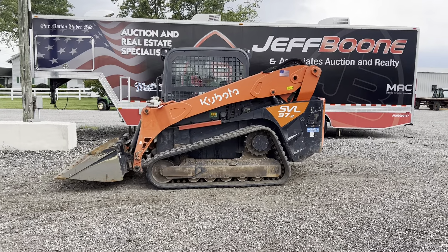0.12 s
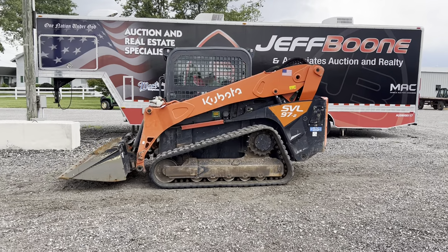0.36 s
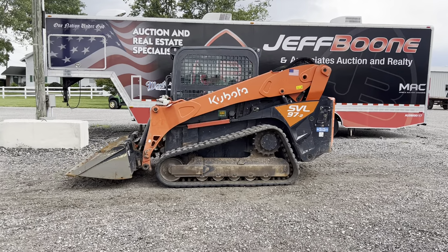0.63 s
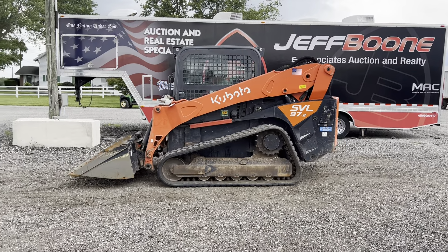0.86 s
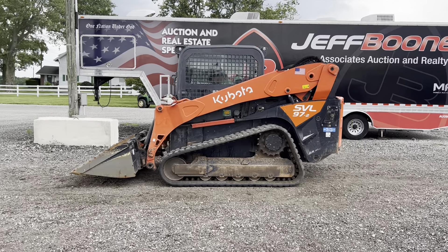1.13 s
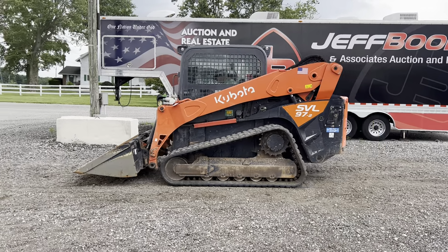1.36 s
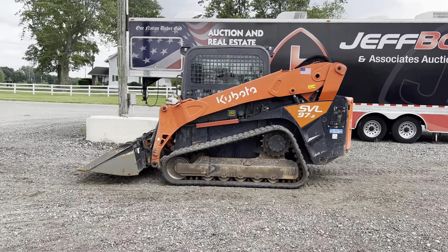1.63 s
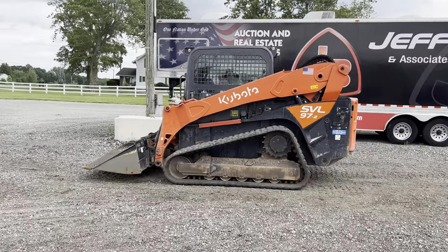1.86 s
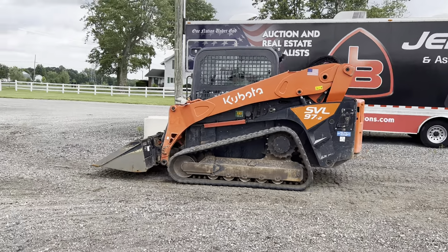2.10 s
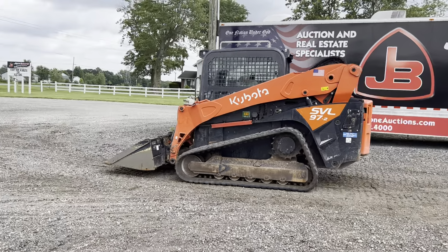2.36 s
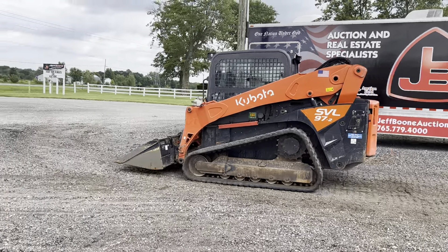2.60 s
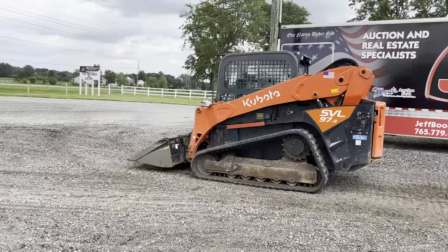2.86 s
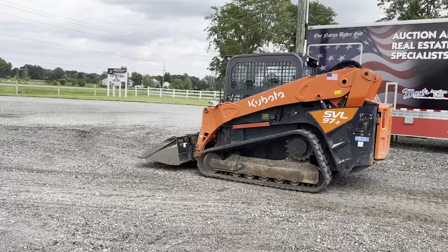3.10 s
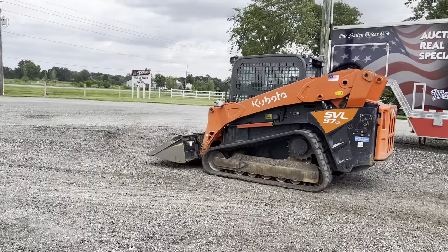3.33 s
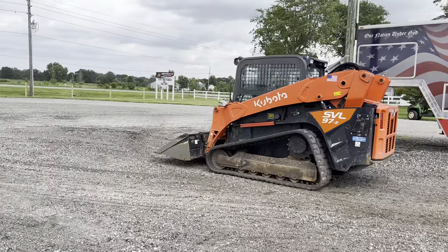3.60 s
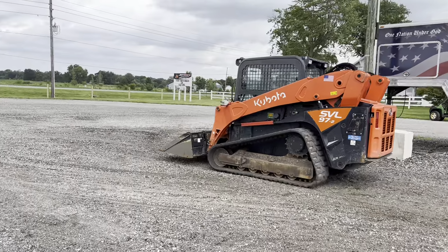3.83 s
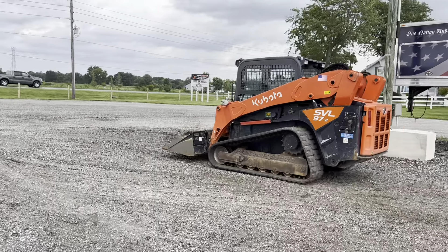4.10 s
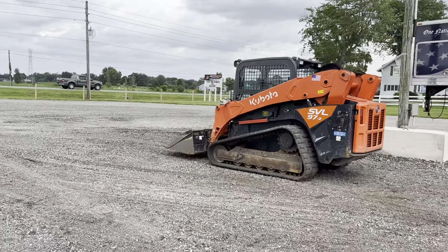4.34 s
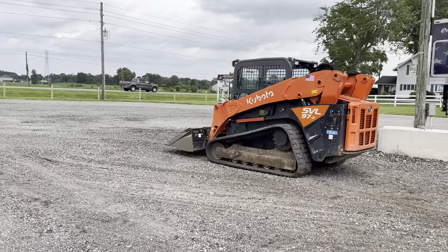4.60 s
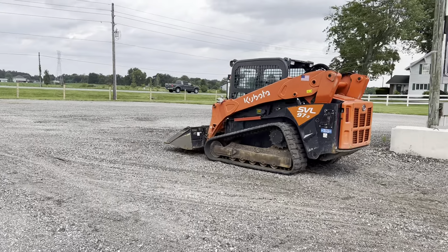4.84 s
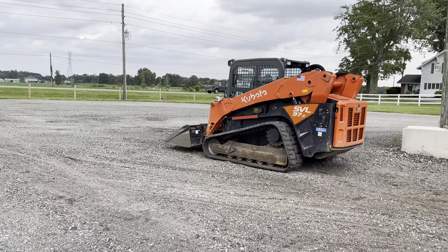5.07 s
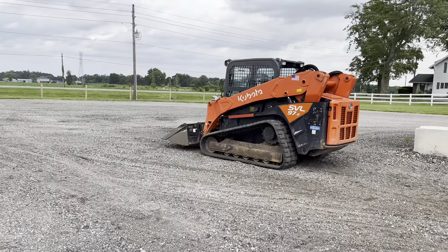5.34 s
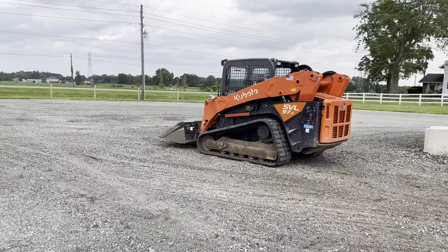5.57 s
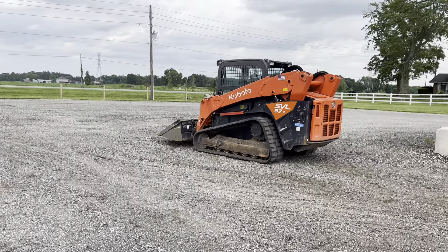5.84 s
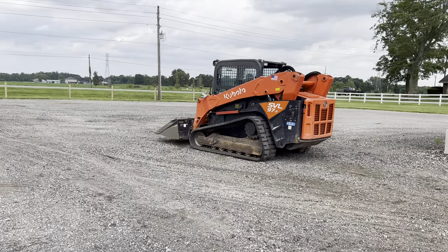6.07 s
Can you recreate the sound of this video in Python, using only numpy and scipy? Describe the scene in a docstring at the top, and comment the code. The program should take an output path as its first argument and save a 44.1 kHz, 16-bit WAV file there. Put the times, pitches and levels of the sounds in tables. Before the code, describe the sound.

A handheld phone hears a compact diesel machine idling roughly, then setting off on steel-sounding tracks. Dry clanks come around eighteen a second, with crisp gravel crunch and bright stone cracks. Small wind pops accompany it from the start; in the second half a low exhaust hum surges unevenly and strong gusts thump and rumble over everything in the open lot.

```python
"""Gravel lot: a tracked diesel loader idles, pulls away and drives off past a phone in rising wind.
Randomly rough coloured noise makes the engine roar, with a drive whirr and an exhaust hum.
Damped sines make sprocket teeth clank in the tracks and stones ping; coloured noise makes gravel crunch.
Gusts are lumpy low noise with pops on the two microphone ports; the bass edge slides along a curve."""
import sys
import numpy as np
from scipy import signal
from scipy.fft import rfft, irfft, next_fast_len
from scipy.io import wavfile
from scipy.ndimage import uniform_filter1d, map_coordinates

SR = 44100
rng = np.random.default_rng(int(sys.argv[2]) if len(sys.argv) > 2 else 0)


def natural_amplitude(level_db):
    """Convert a level in decibels to a linear amplitude factor, elementwise."""
    exponent = np.asarray(level_db, float) / 20
    return 10 ** exponent


def materialize(psi):
    """Save the field psi as 16-bit PCM at rate SR to the path in sys.argv[1].

    A 1-D psi becomes a single channel; in a 2-D psi each row is a channel.
    """
    bounded = np.clip(np.atleast_2d(psi).T, -1, 1)
    quanta = np.round(bounded * 32767).astype(np.int16)
    wavfile.write(sys.argv[1], SR, quanta)


N = 273420

# The machine gets under way. Each row: time in seconds, engine roar in dB, whirr of the drive in dB,
# grinding of gravel in dB, fine crunch in dB.
DRIVE = [(0, -32.5, -40.5, -56, -61), (.9, -34, -37.5, -50, -73), (1.15, -31.5, -33.5, -49, -53),
         (1.45, -28, -30.5, -45, -45.5), (2, -29, -29.5, -44, -49), (2.6, -30.5, -30, -43, -48.5),
         (2.92, -30, -31, -42, -48.5), (3.1, -32, -35, -42, -43), (3.3, -30, -29.5, -40.5, -43),
         (3.75, -31, -29.5, -41, -47.5), (4.3, -29.5, -28.5, -39.5, -48), (4.9, -29.5, -29.5, -41, -45),
         (5.25, -30, -30.5, -41, -51), (5.7, -31, -30, -41, -45.5), (6.2, -27.5, -34, -43, -53)]
# Stones cracking under the tracks. Each row: start in seconds, crack level in dB, pitch in Hz,
# level of the grit spray in dB.
STONES = [(.5496, -39, 11400, -54), (.637, -38, 11500, -45), (.841, -35, 7460, -58),
          (1.057, -34, 11100, -39), (1.078, -34, 7300, -55), (1.1588, -38, 12100, -53),
          (1.179, -30, 11000, -37), (1.2705, -34, 8160, -40), (1.411, -36, 6300, -48),
          (1.6087, -30, 6700, -60), (1.655, -34, 7900, -43), (1.6766, -26.5, 6140, -32),
          (1.70, -33, 7700, -38), (1.7893, -29.5, 7760, -66), (1.8497, -38, 5840, -64),
          (1.9041, -35, 6610, -60), (1.9555, -31, 6560, -61), (2.2797, -41, 6400, -36),
          (2.39, -30, 13200, -35.5), (2.4987, -25, 10500, -33.5), (2.7137, -36, 11600, -51),
          (2.8794, -35, 7300, -50), (2.9427, -31, 13900, -40), (2.9851, -32, 13900, -44),
          (3.0759, -33, 11600, -39), (3.1455, -29, 11000, -45), (3.3104, -34, 12500, -46),
          (3.3787, -31, 11600, -50), (3.5556, -26, 11400, -41), (3.6366, -37, 12500, -34),
          (3.7609, -37, 12700, -50), (4.115, -36, 12100, -37), (4.5446, -32, 11400, -57),
          (4.825, -33, 11200, -61), (5.006, -22, 11040, -45), (5.105, -29, 11200, -66),
          (5.2051, -31, 6360, -58), (5.217, -30, 5700, -60), (5.238, -30, 11100, -53),
          (5.6057, -31, 7900, -57), (5.7284, -34, 11400, -59)]
# Wind at the microphone. Each row: time in seconds, rumble in dB, deep buffeting in dB,
# bass edge in octaves under 400 Hz.
WIND = [(0, -33, -87, 0.67), (.12, -31, -73, 1), (.23, -29.5, -59, 0.92), (.33, -36.5, -66, 1.07),
        (.5, -22, -70, 0.9), (.76, -33, -88, 0.42), (1, -26.5, -87, 0.74), (1.4, -28, -72, 1.23),
        (1.55, -25.5, -74, 0.98), (2, -28.5, -70, 1.27), (2.2, -27.5, -70, 1.64), (2.35, -23, -68, 1.14),
        (2.48, -31, -58, 2.4), (2.67, -33, -80, 0.55), (2.83, -30, -56, 1.25), (2.9, -36, -58, 2),
        (2.96, -39, -70, 0.83), (3.04, -34, -82, 0.67), (3.2, -28, -68, 0.84), (3.27, -36, -54, 1.74),
        (3.34, -28, -66, 1.8), (3.42, -29.5, -72, 1.8), (3.55, -28, -76, 1.3), (3.72, -23, -73, 1.4),
        (3.85, -23, -56, 1.55), (4.3, -12.5, -39, 1.44), (4.44, -22, -48, 1.37), (4.62, -13.5, -41, 1.45),
        (5, -17, -40, 1.27), (5.2, -13.5, -43, 1.24), (5.33, -18.5, -49, 2.93), (5.4, -18, -26, 1.4),
        (5.55, -15, -15.5, 2.5), (5.75, -14.5, -21.5, 1.8), (5.96, -14.5, -17.5, 1.7),
        (6.2, -17, -22.5, 1.8)]


def unit(x):
    """Scaled to rms 1."""
    return x / np.sqrt(np.mean(x ** 2) + 1e-20)


def columns(rows, at, scale=lambda v: v):
    """Every column after the first, joined by straight lines and read at the given places."""
    first, *cols = np.transpose(rows)
    return [np.interp(scale(at), scale(first), c) for c in cols]


def curves(rows):
    """One value per sample for each column after the time."""
    return columns(rows, np.arange(N) / SR)


def wobble(rate):
    """A smooth random curve, rate knots a second."""
    knots = rng.standard_normal(int(N * rate / SR) + 4)
    return map_coordinates(knots, [np.arange(N) * rate / SR])


def filtered(x, response):
    """x times a complex response of frequency."""
    m = next_fast_len(N + SR // 2)
    hz = np.fft.rfftfreq(m, 1 / SR) + 1
    return irfft(rfft(x, m) * response(hz), m)[..., :N]


def rush(spectrum, lumps=1):
    """Two unrelated noises of one colour, rms 1 together, under shared lumps."""
    noise = lumps * rng.standard_normal((2, N))
    return unit(filtered(noise, lambda hz: natural_amplitude(columns(spectrum, hz, np.log)[0])))


def patchy(x, depth_db):
    """Random patches of gain, each some tens of ms long and some tens of Hz wide; rms 1."""
    z = signal.stft(x, nperseg=1024)[2]
    field = rng.standard_normal(z.shape[1:])
    field = uniform_filter1d(uniform_filter1d(field, size=2, axis=0), size=3, axis=1)
    return unit(signal.istft(z * natural_amplitude(depth_db * unit(field)), nperseg=1024)[1][:, :N])


def scattered(x, t60):
    """A hit, and the same hit smeared by a short tail of dying noise."""
    t = np.arange(SR // 20) / SR
    tail = rng.standard_normal(len(t)) * natural_amplitude(-60 * t / t60)
    return np.array([x, signal.fftconvolve(x, tail / np.linalg.norm(tail))[:N]])


def pings(rows, cycles, spread, longer, swell=0.23):
    """Damped sines that swell and die within some cycles, each with a stronger neighbour in pitch."""
    out, t = np.zeros(N + SR), np.arange(SR // 20) / SR
    for (s, db, hz), near in zip(rows, rng.standard_normal(len(rows))):
        u = t * hz / (cycles * (hz / 7000) ** longer)  # above 0, longer gives high pitches more cycles
        ring = np.sin(2 * np.pi * t * hz)
        ring = ring + 2.65 * np.sin(2 * np.pi * t * hz * (1 + spread * near))
        out[round(s * SR):][:len(t)] += natural_amplitude(db) * u ** swell * np.exp(-u) * ring
    return out[:N]


def pops(rows, cycles):
    """Brief pushes of pressure that swell and sink evenly about their middle."""
    out, t = np.zeros(N + SR), np.arange(-SR // 20, SR // 20) / SR
    for s, db, hz in rows:
        bell = np.exp(-(t * hz / cycles) ** 2)
        out[round(s * SR):][:len(t)] -= natural_amplitude(db) * bell * np.cos(2 * np.pi * hz * t)
    return out[SR // 20:][:N]


def engine():
    """Randomly rough roar with barely a trace of the firing rate, drive whirr, hum at three times that rate."""
    # Colour of the roar. Each row: frequency in Hz, relative density in dB.
    roar_colour = [(200, -4.5), (400, 4), (560, -3), (850, -7.5), (1000, -12.5), (1120, -11.5),
                   (1280, -7.5), (1420, -10.5), (1650, -12), (1850, -12.5), (2070, -20), (2400, -13.5),
                   (2700, -25), (3050, -21), (3450, -25.5), (4500, -23), (5300, -37), (6500, -26.5),
                   (9000, -58), (16000, -36)]
    # Colour of the whirr. Each row: frequency in Hz, relative density in dB.
    whirr_colour = [(400, -32), (650, -1.5), (800, 0.5), (930, 0.5), (1050, -6), (1400, -14), (1650, -9),
                    (1900, -14.5), (2100, -51), (4000, -70)]
    # The exhaust hum swells and sinks. Each row: time in seconds, level in dB.
    hum_levels = [(0, -40), (1.1, -41), (1.67, -27), (1.85, -52), (1.95, -28), (2.2, -58), (2.33, -38),
                  (2.6, -36), (2.9, -29), (3.0, -58), (3.6, -55), (3.73, -19), (3.82, -25), (3.95, -16),
                  (4.05, -22), (4.14, -26), (4.25, -18.5), (4.4, -32), (4.5, -22), (4.56, -20.5),
                  (4.66, -19), (4.73, -25), (4.82, -15.5), (4.9, -20), (4.97, -29), (5.06, -11.5),
                  (5.18, -27.5), (5.25, -21), (5.35, -30), (5.45, -28), (5.58, -18.5), (5.68, -17),
                  (5.77, -34), (5.9, -22.5), (6.2, -26)]
    firing_hz = 74.1  # the middle of a slight drift
    roar_db, whirr_db = curves(DRIVE)[:2]

    phase = 2 * np.pi * np.cumsum(firing_hz * (1 + 0.0043 * wobble(5.01))) / SR
    roughness = natural_amplitude(0.12 * np.cos(phase) + 0.95 * wobble(40) + 1.65 * wobble(150))
    roar = natural_amplitude(roar_db + 0.83 * wobble(25)) * patchy(rush(roar_colour, roughness), depth_db=1.96)

    drive_noise = patchy(rush(whirr_colour, natural_amplitude(1.5 * wobble(60))), depth_db=3.0)
    whirr = natural_amplitude(whirr_db + 0.68 * wobble(30)) * (drive_noise + whine())

    waver = .7 * wobble(22) + 1.2 * wobble(6)  # radians
    tone = np.sin(3 * phase + waver + [[0], [1.5]]) * [[1], [.6]]
    hum = natural_amplitude(curves(hum_levels)[0] + 1.7 * wobble(20)) * tone
    return roar + whirr + hum


def whine():
    """Drifting tones of the hydraulic drive, each wavering in pitch and strength on its own."""
    # Rough tones of the drive. Each row: nominal pitch in Hz, level over the whirr in dB.
    tones = [(700, -14), (790, -12.5), (900, -10.5), (1270, -25.5), (1650, -16.5)]
    # The drive's pitch sinks, then creeps up under load. Each row: time in seconds, pitch ratio.
    strain = [(0, 1.05), (1.2, 0.96), (2.9, 0.97), (3.3, 1.02), (4.6, 1.04), (6.2, 1.05)]
    ratio, = curves(strain)

    def tone(hz):
        drift = 1 + .012 * wobble(4) + .012 * wobble(30)
        return np.sin(2 * np.pi * np.cumsum(hz * ratio * drift) / SR)

    return sum(natural_amplitude(db + 2.1 * wobble(12)) * tone(hz) for hz, db in tones) * np.array([[1], [.5]])


def tracks():
    """Each tooth is a dry crack of a few milliseconds that briefly rings the steel at new strengths."""
    # Sprocket teeth meeting the track. Each row: start in seconds, upper ring in dB, lower ring in dB.
    clanks = [(0.4884, -55, -56), (0.615, -34, -50), (1.077, -45, -42), (1.257, -32, -45),
              (1.3364, -37, -42), (1.4162, -30, -41), (1.4826, -28, -33), (1.5362, -35, -40),
              (1.582, -43, -48), (1.6087, -24, -27), (1.675, -26.5, -30), (1.7305, -26.5, -36),
              (1.7897, -26, -35), (1.8492, -29, -32), (1.8835, -34, -41), (1.9052, -25, -28),
              (1.956, -25, -30), (1.9914, -29, -42), (2.01, -28, -30), (2.037, -32, -31),
              (2.0635, -28.5, -33), (2.1164, -31, -32), (2.173, -29.5, -35), (2.2288, -30, -33),
              (2.285, -31, -31), (2.3401, -39, -38), (2.397, -27, -33), (2.4508, -22.5, -29.5),
              (2.482, -32, -33), (2.5122, -30.5, -35), (2.5607, -36, -31), (2.6272, -28, -30),
              (2.6678, -37, -38), (2.68, -26.5, -30), (2.7378, -29, -35), (2.7676, -41, -40),
              (2.7976, -41, -38), (2.8644, -41, -36), (2.9023, -37, -37), (2.953, -31, -29),
              (3.0056, -34, -34), (3.0634, -34, -29.5), (3.1064, -41, -32), (3.124, -38, -33),
              (3.17, -33, -31), (3.237, -38, -35), (3.2886, -30, -39), (3.3513, -32, -34),
              (3.4084, -33.5, -42), (3.468, -33, -43), (3.5059, -30.5, -35), (3.6341, -30, -38),
              (3.6744, -34, -42), (3.7413, -31, -34), (3.7993, -34, -36), (3.8536, -28, -30),
              (3.9098, -27, -31), (3.948, -33, -38), (4.0204, -29, -31), (4.0778, -28, -26.5),
              (4.1224, -33, -36), (4.1884, -28, -34), (4.2436, -33, -32), (4.3537, -33, -36),
              (4.4116, -36, -33), (4.7484, -38, -36), (4.7835, -37, -34), (4.9676, -41, -44),
              (5.3138, -38, -31), (5.7069, -36, -33)]
    # Ringing of the undercarriage. Each row: nominal pitch in Hz, relative level in dB, t60 in seconds.
    steel = [(1585, 8, 0.025), (2380, -6, 0.016), (2850, 2, 0.018), (3087, 3, 0.024), (3700, -3, 0.016),
             (4250, -1, 0.015), (4620, -2, 0.014), (5100, -8, .012), (5900, -15, .012), (6500, -12, 0.014),
             (7670, -10, 0.012)]
    upper_from_hz = 3400
    rolling_s, rattles, rattle_db, fade_db_per_s = 1.25, 150, -45, 1.6
    out, t = np.zeros(N + SR), np.arange(SR // 20) / SR
    hz, level, t60 = np.transpose(steel)[:, :, None]

    # faint loose rattles once the tracks roll: up to 8 dB stronger, lower ring up to 8 dB weaker
    late, size, dark = rng.random((rattles, 3)).T ** [[1.15], [2], [1]] * [[N / SR - rolling_s], [8], [8]]
    loose_db = rattle_db + size - fade_db_per_s * late
    hits = list(clanks) + list(zip(rolling_s + late, loose_db, loose_db - dark))

    for (s, upper_db, lower_db), luck in zip(hits, rng.standard_normal((len(hits), 2, len(steel), 1))):
        blow_db = np.where(hz > upper_from_hz, upper_db, lower_db) + level + 2.2 * luck[0]
        sines = np.sin(2 * np.pi * hz * (1 + 0.025 * luck[1]) * t)
        ring = (natural_amplitude(blow_db - 60 * t / t60) * sines).sum(axis=0)
        grit = np.diff(uniform_filter1d(rng.standard_normal(len(t) + 1), size=6))
        crack = natural_amplitude(upper_db + 15 - 60 * t / 0.03) * grit
        out[round(s * SR):][:len(t)] += (ring + crack) * (1 - np.exp(-t / 0.00027))
    # the clanks are dull above about 8.6 kHz
    dull = filtered(out[:N], lambda hz: 1 / (1 + (hz / 8600) ** 8))
    return scattered(dull, t60=0.012)


def gravel():
    """Stones grind under the tracks in clumps and crack; fine crunch is spiky, and track pins tinkle with it."""
    # Colour of the grinding. Each row: frequency in Hz, relative density in dB.
    grind_colour = [(1500, -64), (2400, -4.5), (2700, -7), (2950, 4), (3200, 3), (3500, -5.5),
                    (4500, -10.5), (5300, -3), (6500, -4), (7150, -9), (7700, -4.5), (8500, -11.5),
                    (10000, -4), (16000, -31)]
    # Colour of the fine crunch and the grit. Each row: frequency in Hz, relative density in dB.
    crunch_colour = [(6000, -26), (7200, -14), (7800, -7), (8500, -7), (10000, -6), (10600, -9), (11300, 0),
                     (11900, -4), (12600, -5), (13900, -12), (14800, -7), (15800, -7)]
    # Where the track pins tinkle. Each row: pitch in Hz, relative level in dB.
    pins = [(7550, -3), (10800, 1), (11300, 2), (11600, 0), (12500, -2), (13900, -6)]
    spray_grinds_db, tinkles = -9, 500
    grind_db, crunch_db = curves(DRIVE)[2:]
    clumps, surge, spray = wobble(32), wobble(15), sprays()

    grinding = natural_amplitude(grind_db + 0.66 * surge) + natural_amplitude(spray_grinds_db) * spray
    grind_lumps = natural_amplitude(0.6 * clumps + 0.8 * wobble(250)) * (1 + 0.49 * slips(count=700, t60=0.014))
    grind = rush(grind_colour, grind_lumps)

    crunching = natural_amplitude(crunch_db + 1.9 * surge)
    spikes = .8 + .8 * slips(count=500, t60=.035) + .7 * slips(count=2200, t60=.006)
    crunch = rush(crunch_colour, natural_amplitude(1.8 * clumps) * spikes)

    when, which, size = rng.random((tinkles, 3)).T
    hz, db = np.transpose(pins)[:, (which * len(pins)).astype(int)]
    # each tinkle follows the crunch level of its moment
    db = db + 20 * np.log10(crunching[(when * N).astype(int)]) + 0.5 - 1.1 * np.log(size)
    tinkle = pings(np.transpose([when * N / SR, db, hz]), cycles=50, spread=.025, longer=0)
    cracks = pings(np.array(STONES)[:, :3], cycles=20, spread=.025, longer=2)
    sharp = scattered(tinkle + .5 * cracks, t60=0.00054)
    return grinding * grind + crunching * crunch + spray * rush(crunch_colour) + sharp


def slips(count, t60):
    """An envelope of sudden jumps that die away."""
    when, size = rng.random((count, 2)).T
    jumps = np.bincount((when * N).astype(int), -np.log(size), N)
    return signal.lfilter([1], [1, -natural_amplitude(-60 / (t60 * SR))], jumps)


def sprays():
    """Envelope of the grit thrown around each cracking stone."""
    rise_s, fall_s = 0.0048, 0.014  # time constants
    t = np.arange(N) / SR
    peaks = np.array(STONES)[:, [0, 3]] + [rise_s, 0]
    return sum(natural_amplitude(db) * np.exp(np.minimum((t - s) / rise_s, (s - t) / fall_s)) for s, db in peaks)


def bumps():
    """Short pops that stand out of the rumble, each with a brief bright edge."""
    # Short pops and thumps. Each row: middle in seconds, level in dB, pitch in Hz, bright edge in dB.
    thumps = [(0.0535, -19, 420, -37.0), (0.069, -21, 418, -37.0), (0.191, -19, 331, -35),
              (0.2072, -21, 528, -39.0), (0.221, -17.5, 469, -28), (0.361, -22, 294, -39),
              (0.387, -16, 515, -45), (0.4581, -17.5, 331, -33), (0.4834, -16, 376, -36.0),
              (0.5092, -17.5, 540, -40), (0.565, -15.5, 333, -27), (0.5865, -19, 372, -22),
              (0.617, -22, 840, -40), (0.6271, -20, 469, -29), (0.647, -20, 372, -38),
              (0.6712, -16.5, 331, -25), (0.753, -20, 660, -42), (0.777, -29, 418, -33.0),
              (0.8065, -13, 460, -24), (0.8334, -26, 294, -39), (0.858, -27, 372, -44),
              (0.904, -23.0, 294, -38.0), (1.0132, -17, 469, -37), (1.0717, -15, 466, -33),
              (1.1215, -20, 328, -25), (1.1878, -13, 473, -26), (1.209, -16, 262, -31.0),
              (1.295, -18, 418, -37), (1.314, -17, 294, -28.0), (1.3414, -16, 331, -29),
              (1.497, -19, 328, -22), (1.5238, -13, 746, -40), (1.6132, -15, 667, -40),
              (1.653, -20, 748, -40), (1.661, -13.5, 416, -37), (1.6795, -14.5, 233, -24),
              (1.7567, -12.5, 331, -31), (1.7838, -13, 525, -25.0), (1.8428, -17, 334, -15),
              (1.941, -22, 294, -36), (1.9857, -15.5, 331, -35.0), (2.0019, -11, 331, -23),
              (2.0448, -20, 750, -40), (2.071, -13.5, 800, -40), (2.2182, -14, 528, -25.0),
              (2.2518, -12, 720, -40), (2.287, -21, 830, -40), (2.461, -14, 463, -17),
              (2.5403, -16, 213, -14), (2.6198, -17.5, 233, -24), (2.7625, -16, 233, -30.0),
              (2.775, -23, 810, -40), (2.801, -16.0, 374, -16), (2.8233, -15.0, 262, -18),
              (2.8526, -16, 750, -40), (2.875, -20, 372, -21), (2.892, -18, 207, -23),
              (2.9081, -25, 750, -40), (2.999, -37, 593, -43), (3.1157, -18.5, 331, -26),
              (3.258, -22, 900, -40), (3.2748, -7.5, 139, -38), (3.291, -15.5, 1010, -42),
              (3.4044, -14, 184, -26), (3.4266, -13, 180, -28.0), (3.636, -16, 860, -42),
              (3.69, -17, 900, -40), (3.721, -12, 208, -25.0), (3.8466, -6.5, 198, -17),
              (3.956, -9, 200, -31), (4.254, -8, 230, -31.0), (4.339, -7.5, 266, -30),
              (4.5628, -8, 231, -25), (4.5876, -8, 214, -24), (4.6376, -6, 236, -25.0),
              (4.7354, -8, 207, -17), (4.887, -25, 800, -42), (5.065, -8.5, 235, -20),
              (5.253, -7, 205, -28), (5.4164, -6, 205, -24), (5.6286, -3.5, 203, -32),
              (5.8575, -1.5, 182, -28.0), (5.9712, -9, 129, -35.0)]
    edge_hz = 790
    knocks = pops([row[:3] for row in thumps], cycles=0.85)
    edges = pops([(s, db, edge_hz) for s, _, _, db in thumps], cycles=1.13)
    return scattered(knocks + edges, t60=0.012) * [[.9], [.8]]


def wind():
    """Spiky rumble of gusts on the ports."""
    # Colour of the rumble. Each row: frequency in Hz, relative density in dB.
    rumble_colour = [(20, -3.5), (60, 2), (200, -1), (350, -5.5), (480, -17.5), (700, -26), (1200, -78)]
    gusty_db = 1.0  # flurries inside the gusts
    spiky = rush(rumble_colour, natural_amplitude(1.0 * wobble(30) + 2.0 * wobble(70)))
    return natural_amplitude(curves(WIND)[0] + gusty_db * wobble(20)) * spiky


def buffeting():
    """Slow, deep lumps of the strongest gusts."""
    # Colour of the buffeting. Each row: frequency in Hz, relative density in dB.
    deep_colour = [(20, -50), (30, -31), (40, -7), (50, 3), (85, 3), (130, -3), (250, -50), (400, -120)]
    swings_db = 3
    return natural_amplitude(curves(WIND)[1] + swings_db * wobble(18)) * rush(deep_colour, natural_amplitude(0.91 * wobble(4.7)))


def above_edge(x):
    """A steep low cut on wind and machine alike, whose edge slides along a given curve with small swings."""
    swings_oct = .15
    hz, t, z = signal.stft(x, SR, nperseg=4096, noverlap=3584)
    octaves = curves(WIND)[2] + swings_oct * wobble(12)
    edge_hz = 400 * 2 ** -octaves[np.minimum((t * SR).astype(int), N - 1)]
    gain = 1 / np.sqrt(1 + (edge_hz / (hz[:, None] + 1)) ** 13.1)
    return signal.istft(z * gain, SR, nperseg=4096, noverlap=3584)[1][:, :N]


def ports(pair):
    """Two ports hear a part of their own and a shared one; phase and level shifts vary with frequency."""
    # Stereo of the two ports. Each row: frequency in Hz, likeness from 0 to 1,
    # lead of the right port in radians, excess of the left port in dB.
    stereo = [(30, .75, 0, .8), (60, .66, 0, .8), (100, .75, 0, .5), (600, .6, -.3, .5),
              (900, .9, -.4, 1.5), (1200, .55, .5, 7), (1500, .8, 1.6, 3), (2000, .7, 1.2, 1),
              (2250, .8, .3, -3), (2650, .4, -1, -1), (2950, .68, -.3, -1), (3450, .5, -1.6, 5),
              (4100, .5, .8, 4), (4600, .5, -.5, 0), (5400, .4, -2.2, 4), (6500, .4, -.8, 1),
              (7200, .3, -3, 0), (7600, .65, -3.9, -1), (8200, .5, -5, -4), (8800, .55, -4.6, -1),
              (9300, .97, -3.4, 0), (10000, .99, -3.14, 0), (10800, .97, -2.9, 0), (11500, .88, -2.05, 0),
              (12600, .88, -.5, 0), (14200, .98, .2, 0), (14800, .8, 1.3, 0), (16000, .7, 3, 0)]
    side = np.array([[1], [-1]])  # left, right

    def angle(hz):
        return np.arccos(np.clip(columns(stereo, hz, np.log)[0], 0, 1)) / 2

    def shift(hz):
        _, lead, louder_db = columns(stereo, hz, np.log)
        return np.exp(-.5j * side * lead) * natural_amplitude(side * louder_db / 2)

    shared = filtered(pair[0], lambda hz: np.cos(angle(hz)) * shift(hz))
    own = filtered(pair[1], lambda hz: side * np.sin(angle(hz)) * shift(hz))
    return shared + own


def scene():
    """All sources at the two ports."""
    # How far the sound leans left. Each row: time in seconds, gusts in dB, machine in dB.
    lean = [(0, 1, 0.5), (2.7, 0.5, 0.5), (3.05, -1, 0.5), (3.6, 0.5, -0.5), (5, -0.5, 0), (5.6, -0.5, 0),
            (6.2, -.7, -.5)]
    sources = np.concatenate([wind() + bumps(), engine() + gravel() + tracks()])
    airy, machine = above_edge(sources).reshape(2, 2, N)
    gusts_lean, machine_lean = natural_amplitude(np.array(curves(lean))[:, None] * [[.5], [-.5]])
    return ports(airy + buffeting()) * gusts_lean + ports(machine) * machine_lean


def top_cut(x):
    """Nothing passes above the cut-off."""
    return signal.sosfilt(signal.butter(12, 15820, fs=SR, output="sos"), x)


def record(dry):
    """Peaks are rounded off towards 0.8 of full scale, then everything above the band limit is cut."""
    top_hz = 15830
    rounded = dry / (1 + np.abs(dry / .8) ** 4) ** (1 / 4)
    return top_cut(filtered(rounded, lambda hz: hz < top_hz))


dry = scene()
out = record(dry)
materialize(out)
```